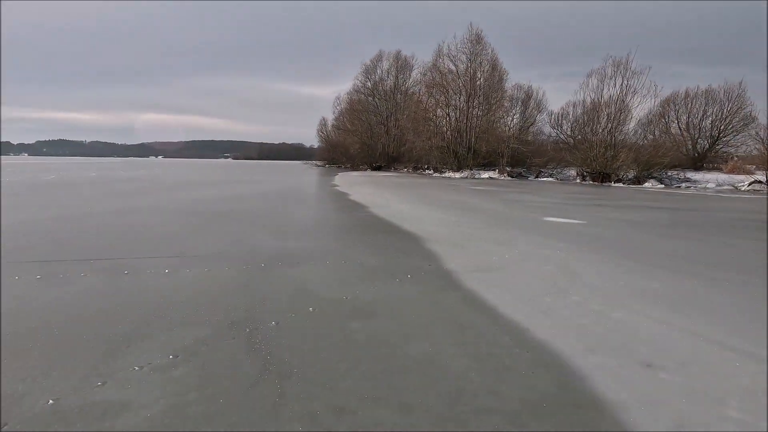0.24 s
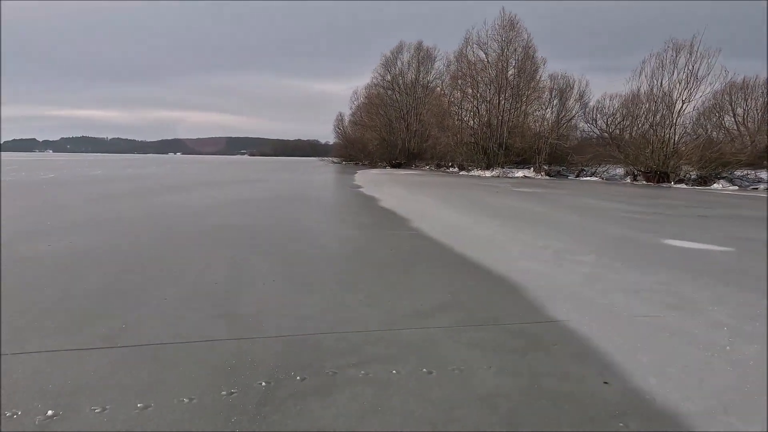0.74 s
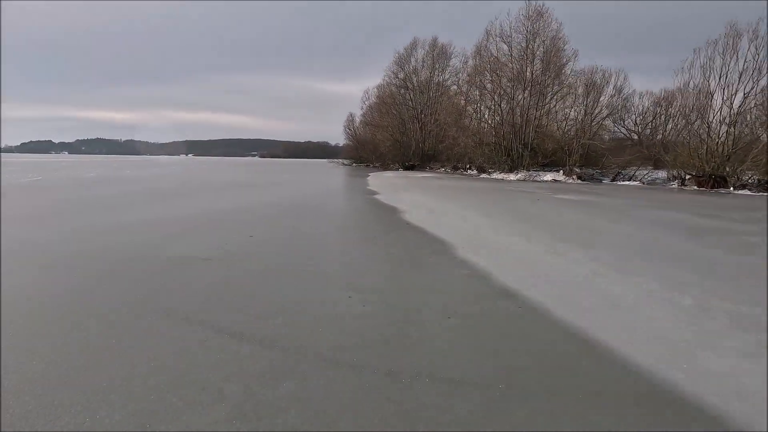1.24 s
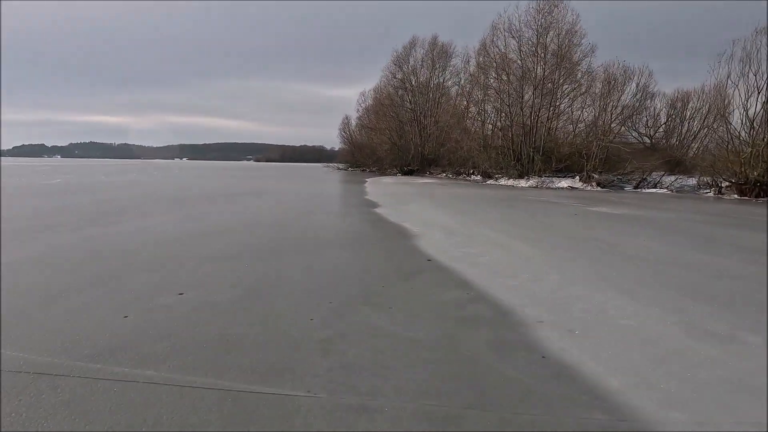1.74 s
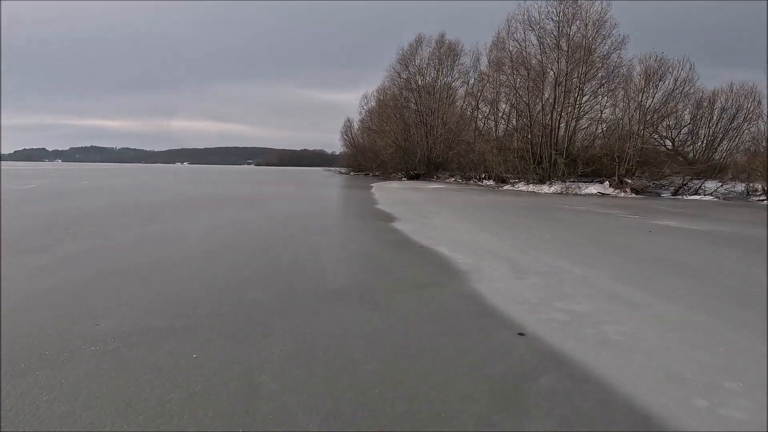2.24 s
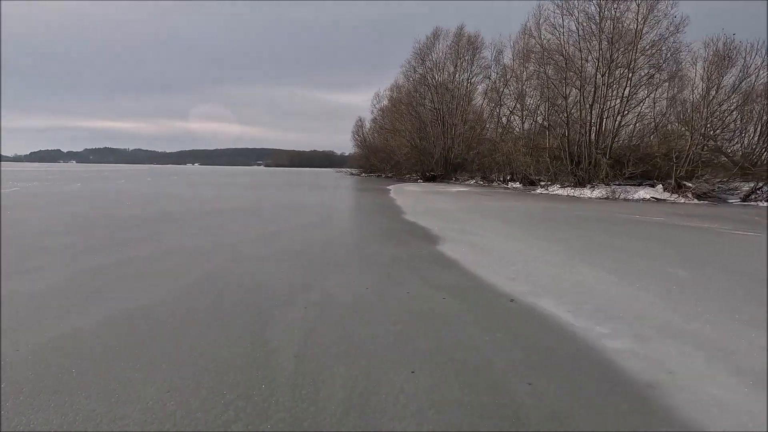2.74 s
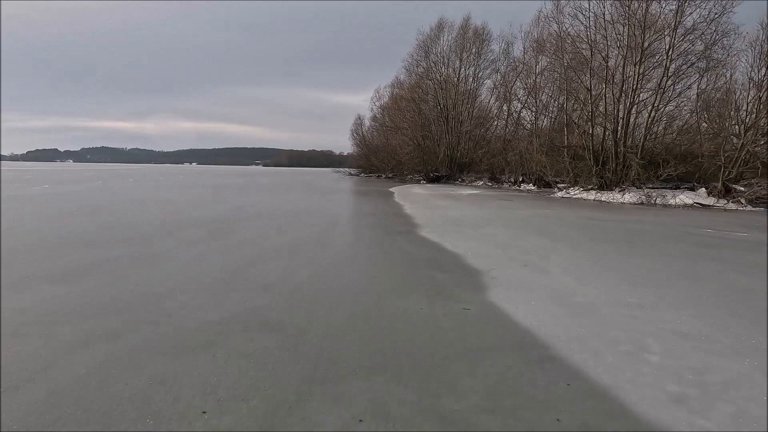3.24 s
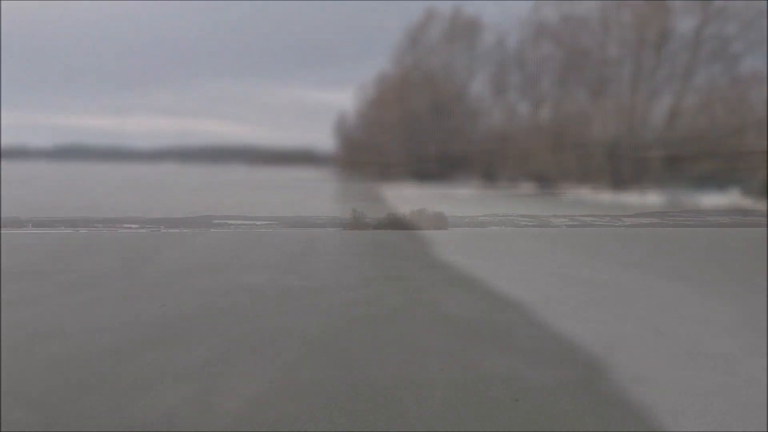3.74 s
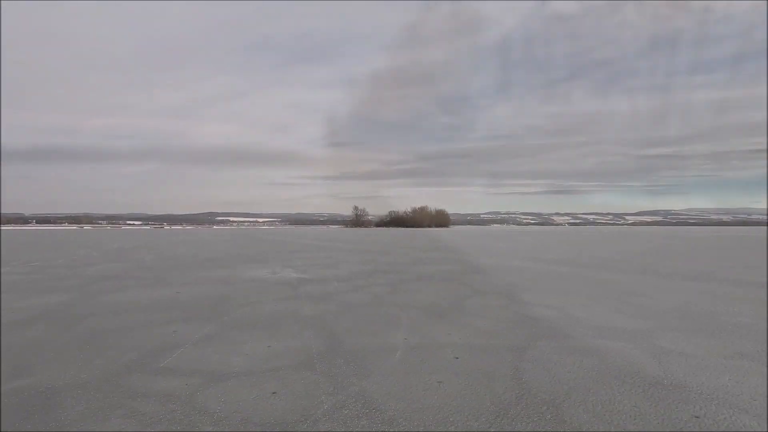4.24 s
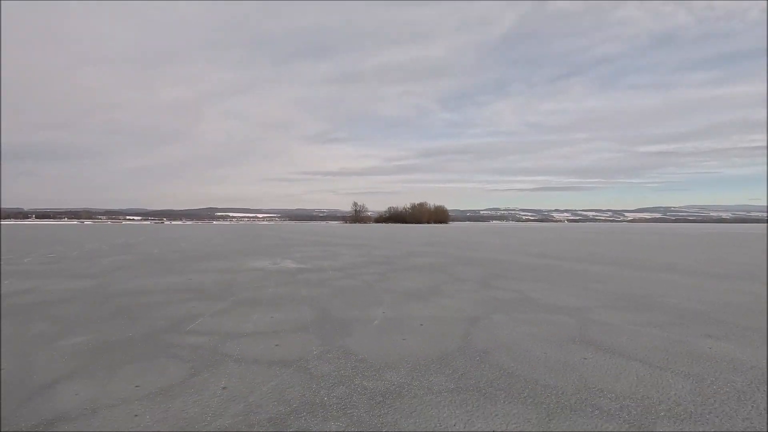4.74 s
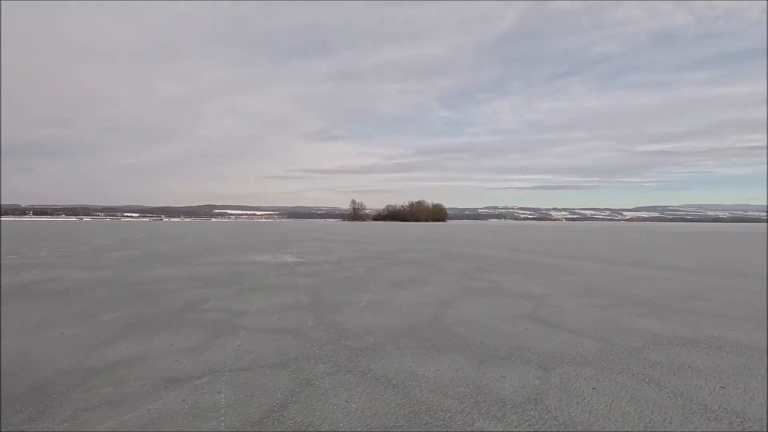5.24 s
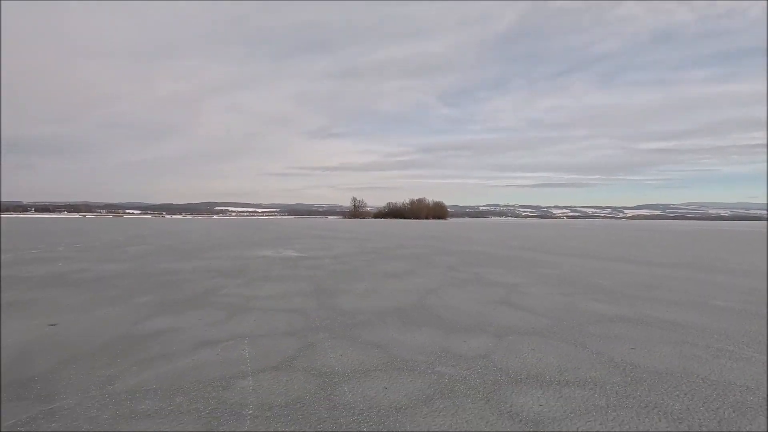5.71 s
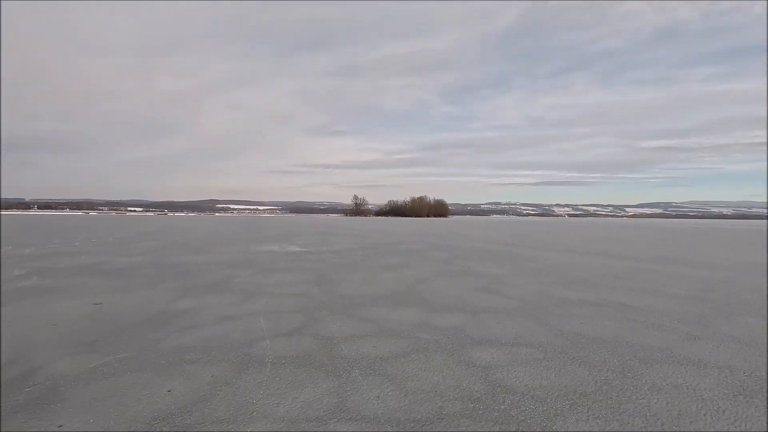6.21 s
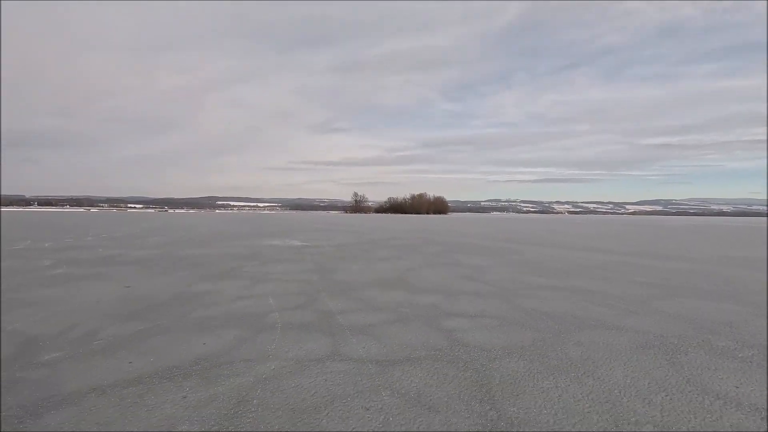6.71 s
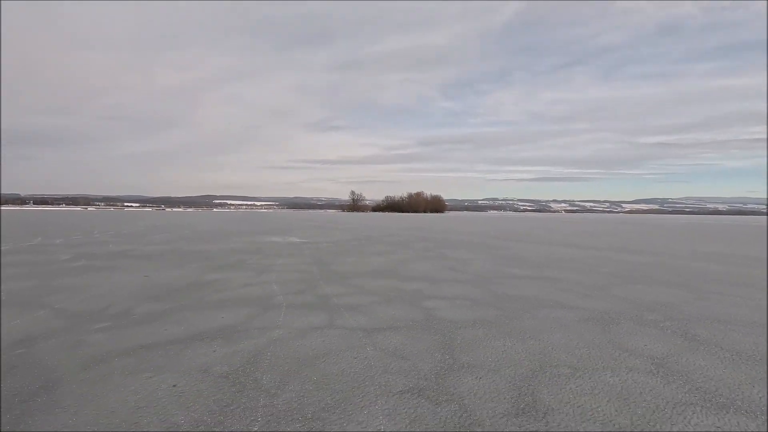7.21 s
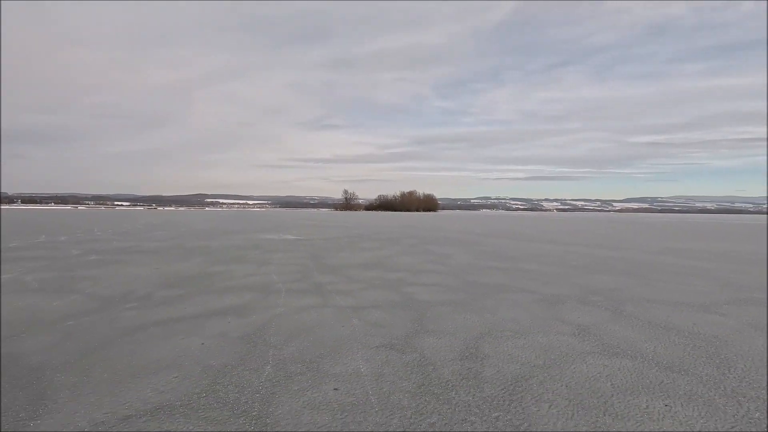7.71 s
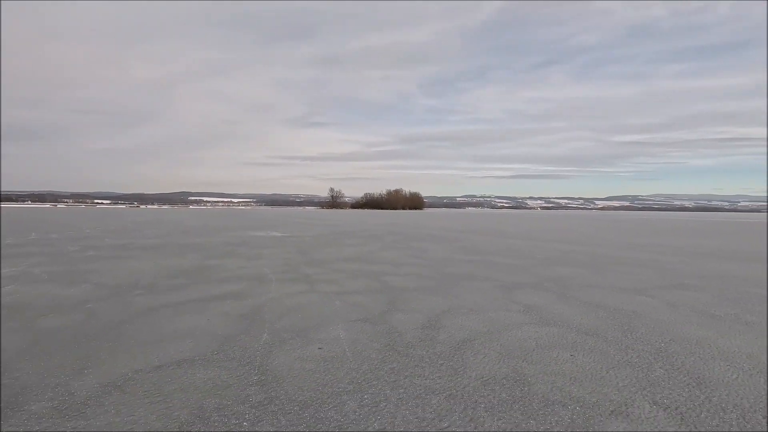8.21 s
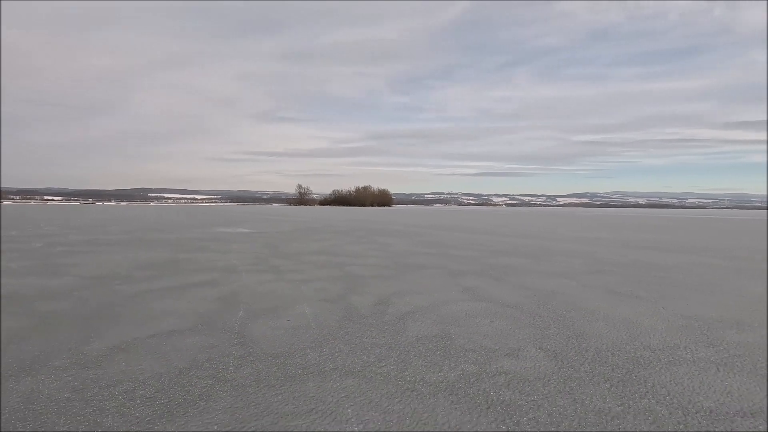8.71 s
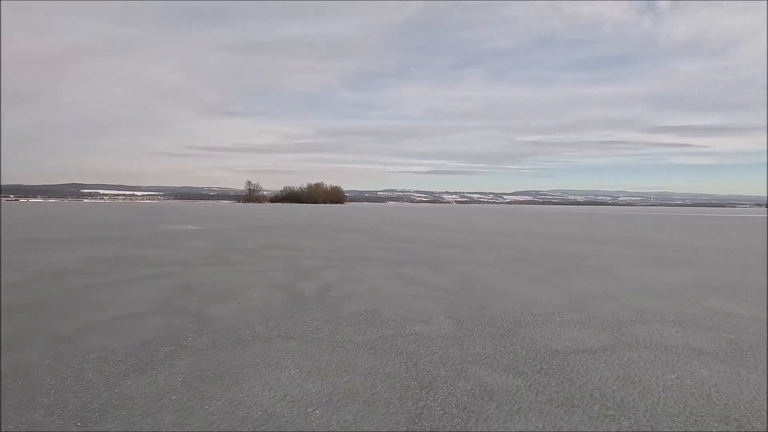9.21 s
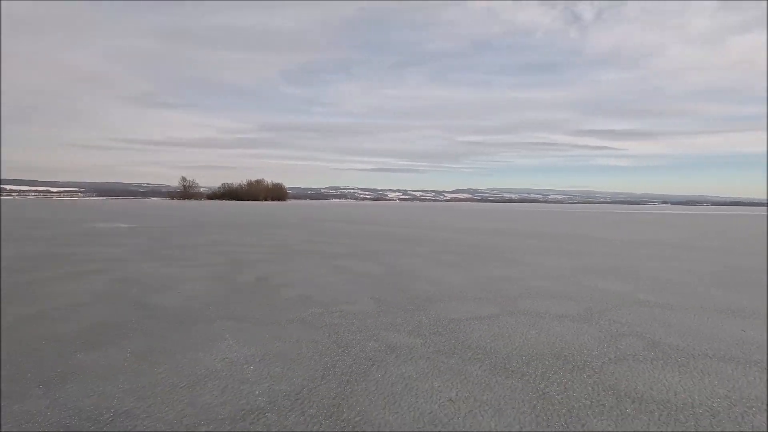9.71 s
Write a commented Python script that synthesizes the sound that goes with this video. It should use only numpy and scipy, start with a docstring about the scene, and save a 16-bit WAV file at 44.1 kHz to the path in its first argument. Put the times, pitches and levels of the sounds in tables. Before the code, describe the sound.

From 0 s, a low skate rumble, crunchy steel grinding and headwind, all close, dry and without echo. From 0.1 s, rapid irregular knocks over rough shore ice: hard clacks with quick falling chirps, gritty crush and a short blade ring. Strong scrapes come around 0.3-0.7 and 1 s, where a short squeal sounds. At 2.0 s a sharper squeal cuts through with scraping until 2.3; more scrapes and faint squeals follow at 2.7-3 s, with tiny ice chips snapping. Around 3.55 s the ice sound changes quickly to a darker, duller open-lake texture. Strong knocks cluster at 3.6-3.9 s, and deep wind thumps peak from 3.9 to 4.5 s. From 5 s scrapes and knocks continue, growing sparser and softer after 6 s. Separate low gusts hit near 6.8, 8.7 and 9.4 s; light scratching, knocks and a final wind swell continue to nearly 10 s.

```python
"""A low rumble of skates, grinding steel and headwind, then from 0.1 s rapid knocks over rough lake ice.
Each knock is a push plus crushed grit, sent through the ice as a quick falling chirp; the blade rings and rasps.
Grinding is noise in spurts with separate crackling grains; scrapes and rides over bumps raise it.
Chips and squeals are noise bursts ringing one mode; wind and rumble are lumpy low noise, eddies short tones.
Two scenes, shore then open ice, join in a 50 ms crossfade; grinding, knocks and rumble differ. No echo."""
import sys
import numpy as np
from scipy import signal
from scipy.fft import rfft, irfft
from scipy.io import wavfile
from scipy.ndimage import uniform_filter1d

SR = 44100
rng = np.random.default_rng(int(sys.argv[2]) if len(sys.argv) > 2 else 0)


def materialize(psi):
    """Save the field psi as 16-bit PCM at rate SR to the path in sys.argv[1].

    A 1-D psi becomes a single channel; in a 2-D psi each row is a channel.
    """
    bounded = np.clip(np.atleast_2d(psi).T, -1, 1)
    quanta = np.round(bounded * 32767).astype(np.int16)
    wavfile.write(sys.argv[1], SR, quanta)


N = 439236
TIME = np.arange(N) / SR
OPEN_FROM_S = 3.56
# event and curve levels below are inputs: filters and layer gains act after them


def amp(db):
    """Decibels to gain."""
    return 10 ** (np.asarray(db) / 20)


def evened(x):
    """Scales to rms 1."""
    return x / np.sqrt(np.mean(x ** 2) + 1e-20)


def shape(points, hz):
    """Gain at hz of a (freq_hz, gain_db) curve, linear in log frequency and flat beyond its ends."""
    freq_hz, gain_db = np.transpose(points)
    return amp(np.interp(np.log(hz + 1), np.log(freq_hz + 1), gain_db))


def curve(points):
    """Linear (time_s, value) curve over the whole scene."""
    time_s, value = np.transpose(points)
    return np.interp(TIME, time_s, value)


def add(mix, centre_s, sound):
    """Mixes in a sound centred on centre_s."""
    start = round(centre_s * SR) - len(sound) // 2
    sound = sound[max(-start, 0):]
    part = mix[max(start, 0):][:len(sound)]
    part += sound[:len(part)]


def flutter(rate_hz):
    """Smooth random signal of rms 1: noise with a Gaussian rolloff at rate_hz."""
    hz = np.fft.rfftfreq(N, 1 / SR)
    slow = rfft(rng.standard_normal(N)) * np.exp(-(hz / rate_hz) ** 2)
    return evened(irfft(slow, N))


def band_rms(spectrum, hz, lo_hz, hi_hz, length_s):
    """Rms within a band, were its energy spread over length_s."""
    inside = (hz >= lo_hz) & (hz < hi_hz)
    energy = np.sum(abs(spectrum[inside]) ** 2) / len(hz)
    return np.sqrt(energy / (length_s * SR) + 1e-20)


def bend(hz, delay_ms):
    """Bending waves in ice: travel time, delay_ms at 1 kHz, goes as 1 / sqrt(f); timed relative to 1 kHz."""
    khz = hz / 1000
    return np.exp(-2j * np.pi * delay_ms * (2 * np.sqrt(khz) - khz))


def resonance(hz, centre_hz, width_hz):
    """Response of one damped mode, gain 1 at its centre."""
    return 1j * hz * width_hz / (centre_hz ** 2 - hz ** 2 + 1j * hz * width_hz)


def ringing(envelope, centre_hz, width_hz):
    """A burst of friction noise rings one mode; rms 1 over the envelope's length."""
    hz = np.fft.rfftfreq(len(envelope), 1 / SR)
    burst = rfft(envelope * rng.standard_normal(len(envelope)))
    return evened(irfft(burst * resonance(hz, centre_hz, width_hz), len(envelope)))


def crossfade(shore, lake):
    """Equal-power crossfade, 50 ms long, at the cut from the first scene's ice sound to the second's."""
    angle = np.pi / 2 * np.clip((TIME - OPEN_FROM_S) * 20 + .5, 0, 1)
    return np.cos(angle) * shore + np.sin(angle) * lake


def turbulence(colour, lo_hz, hi_hz, lumpy_db, lumps_hz):
    """Low noise in lumps, scaled to its rms between lo_hz and hi_hz."""
    hz = np.fft.rfftfreq(N, 1 / SR)
    lumpy = rng.standard_normal(N) * amp(lumpy_db * flutter(lumps_hz))
    spectrum = rfft(lumpy) * shape(colour, hz)
    air = irfft(spectrum / band_rms(spectrum, hz, lo_hz, hi_hz, N / SR), N)
    # the lumps are brief: the level is evened over 6000 samples (0.14 s)
    return air / np.sqrt(uniform_filter1d(evened(air) ** 2, size=6000) + 1e-6)


# steady headwind and skate rumble: time_s, headwind_db, rumble_db
STEADY_LOWS = [(0, -41, -36), (1.2, -43, -54), (2.3, -43.5, -40.5), (3.5, -37, -46.5), (4.2, -40, -43),
               (4.9, -40.5, -61), (6.3, -43, -50), (7.2, -48, -42), (8, -40.5, -53), (9.1, -42.5, -53),
               (9.65, -49.5, -55), (9.96, -32, -44)]
# skate rumble along the shore: freq_hz, density_db_per_hz
SHORE_RUMBLE = [(60, -27), (120, -11), (175, 2), (280, -5.5), (430, -12.5), (700, -50), (1500, -67),
                (4000, -110)]
# skate rumble on the open lake, reaching higher: freq_hz, density_db_per_hz
LAKE_RUMBLE = [(70, -11), (180, -3), (290, -4), (420, -15.5), (580, -21), (800, -50), (1500, -63),
               (4000, -110)]


def rumble(grind, gain_db=-1.5, grind_share_db=-3.5, lake_gain_db=-3.5):
    """The skates rumble over the uneven ice, more when an edge presses hard."""
    time_s, _, rumble_db = np.transpose(STEADY_LOWS)
    steady = amp(np.interp(TIME, time_s, rumble_db))
    level = np.hypot(steady, amp(grind_share_db) * grind)
    shore = turbulence(SHORE_RUMBLE, 130, 450, lumpy_db=5.0, lumps_hz=60)
    lake = turbulence(LAKE_RUMBLE, 130, 400, lumpy_db=8.0, lumps_hz=50)
    return amp(gain_db) * level * crossfade(shore, amp(lake_gain_db) * lake)


# blades running freely: time_s, grinding_db, hiss_db_re_grinding
COASTING = [(0, -40.5, -22.5), (.45, -38.5, -15), (.88, -45.5, -15.5), (1.05, -39, -12), (1.9, -43, -14.5),
            (2.45, -35, -17), (2.65, -45.5, -18), (3.05, -48.5, -16), (3.3, -47.5, -19),
            (3.52, -45.5, -18.5), (3.7, -39.5, -19), (4.349, -37.5, -22.5), (4.6, -46.5, -14.5),
            (5.4, -45.5, -16), (5.8, -39.5, -12), (6.05, -49, -16), (7.3, -52.5, -14), (9.96, -49.5, -13)]
# an edge digs in and scrapes: start_s, length_s, grinding_db, hiss_db_re_grinding
EDGE_SCRAPES = [(0.302, 0.035, -28.5, -13), (0.332, 0.036, -26.5, -23), (0.483, 0.076, -30.5, -15.5),
                (0.605, 0.011, -34, -0.5), (0.634, 0.079, -42.5, -7.5), (0.955, 0.087, -49, -26),
                (1.006, 0.095, -30.5, -20), (1.063, 0.19, -42, -14), (1.27, 0.087, -39, -25),
                (2.014, .048, -28.5, -24), (2.078, 0.042, -29.5, -26), (2.132, 0.035, -34.5, -35),
                (2.211, 0.11, -29.5, -14), (2.72, 0.091, -32, -18.5), (2.835, 0.12, -28, -23),
                (2.986, 0.14, -37, -17.5), (3.544, 0.16, -38, -14.5), (3.84, 0.069, -30.5, -22.5),
                (3.92, 0.025, -33.5, -30), (4.143, .12, -39, -22), (4.494, 0.017, -29.5, -45),
                (4.647, 0.046, -31, -27), (4.883, 0.05, -34.5, -19), (5.104, 0.074, -37.5, -22),
                (5.2, 0.073, -41.5, -10), (5.263, 0.043, -44, -4), (5.444, 0.031, -34.5, -14.5),
                (5.548, 0.15, -40, -14), (5.655, .135, -30, -27), (5.817, 0.11, -45, -11.5),
                (5.96, .05, -52, -13), (5.918, .025, -35, -16), (6.12, 0.061, -55, -10),
                (6.217, 0.018, -38.5, -16), (6.282, 0.018, -44, -33), (6.528, 0.065, -40, -24),
                (6.863, 0.016, -43, -14), (7.081, 0.034, -45, -26), (7.147, 0.035, -39.5, -23),
                (7.767, 0.013, -45, -12), (7.97, 0.057, -41, -13.5), (8.105, 0.023, -37, -30),
                (8.355, 0.024, -36, -23), (8.586, 0.093, -43, -17), (8.724, .11, -37, -22.5),
                (9.056, 0.026, -41, -19), (9.127, 0.069, -40, -17), (9.255, 0.052, -35.5, -16.5),
                (9.416, 0.12, -39, -11.5), (9.557, 0.13, -38.5, -17.5), (9.721, 0.064, -31.5, -18),
                (9.825, 0.087, -37.5, -19)]
BITE_IN_S, LET_GO_S, SAG_DB_PER_S = .007, .0087, -7.5


def pressure():
    """Strength of grinding and of hiss: free running and scrapes add in power."""
    time_s, grind_db, hiss_db = np.transpose(COASTING)
    body = amp(np.interp(TIME, time_s, grind_db)) ** 2
    hiss = amp(np.interp(TIME, time_s, grind_db + hiss_db)) ** 2
    for start_s, length_s, level_db, hiss_db in EDGE_SCRAPES:
        t = np.arange(0, length_s + 10 * LET_GO_S, 1 / SR)
        bite_in = np.minimum(t / BITE_IN_S, 1)
        let_go = np.exp(-np.maximum(t - length_s, 0) / LET_GO_S)
        push = bite_in * amp(level_db + SAG_DB_PER_S * t) * let_go
        centre_s = start_s + t[-1] / 2
        add(body, centre_s, push ** 2)
        add(hiss, centre_s, (push * amp(hiss_db)) ** 2)
    return np.sqrt(body), np.sqrt(hiss)


def crackle(per_s, spread_db, cycles, count=14):
    """Crystals snap one by one; each size of crystal rings for a few cycles at its own pitch."""
    out = np.zeros(N)
    snaps_per_pitch = max(round(per_s * N / SR / count), 1)
    for pitch_hz in np.geomspace(500, 9000, count):
        snaps = np.zeros(N)
        when, size, sign = rng.random((snaps_per_pitch, 3)).T
        strength = amp(spread_db * np.minimum(-np.log(1 - size), 3))
        snaps[(when * N).astype(int)] = np.sign(sign - .5) * strength
        b, a = signal.iirpeak(pitch_hz, max(cycles, 1), fs=SR)
        out += signal.lfilter(b, a, signal.lfilter(b, a, snaps))
    return evened(out)


def slips(per_s, spread_db, life_s):
    """The edge catches and lets go: sudden spurts of friction that die away; rms 1."""
    size = amp(spread_db * np.minimum(rng.exponential(1, N), 3))
    starts = size * (rng.random(N) < per_s / SR)
    return evened(signal.lfilter([1], [1, -np.exp(-1 / (life_s * SR))], starts))


def patches(depth_db, size=1024):
    """The contact point wanders along the blade, so brief narrow bands of the friction noise stand out."""
    z = signal.stft(rng.standard_normal(N), nperseg=size)[2]
    drift = uniform_filter1d(rng.standard_normal(z.shape), size=4, axis=0)
    drift = uniform_filter1d(drift, size=3, axis=1)
    return evened(signal.istft(z * amp(depth_db * evened(drift)), nperseg=size)[1][:N])


# rolloff of the grinding above 8 kHz: freq_hz, gain_db
GRIND_TOP = [(8000, 1.5), (9300, -5), (11200, -8), (12500, -7), (14000, -16), (15500, -31)]


def grinding(colour, grains, steady, patchy_db=7.5, hiss_grain=0.98, hiss_steady=0.47,
             sing=0.11, sing_hz=2640, sing_width_hz=70, delay_ms=1.465):
    """Steel crushes countless small crystals: spurts of noise with separate grains, as a body and a hiss."""
    hz = np.fft.rfftfreq(N, 1 / SR)
    spurts = rng.standard_normal(N) * slips(per_s=170, spread_db=3.0, life_s=0.0053)
    crush = spurts + steady * patches(patchy_db)
    response = shape(colour, hz) * shape(GRIND_TOP, hz) * bend(hz, delay_ms)
    response = response * (1 + sing * resonance(hz, sing_hz, sing_width_hz))
    high = 1 / (1 + (3600 / (hz + 1)) ** 6)  # hiss lies above 3.6 kHz
    body = rfft(crush + grains) * response * (1 - high)
    hiss_noise = crush + hiss_grain * grains + hiss_steady * rng.standard_normal(N)
    hiss = rfft(hiss_noise) * response * high
    body /= band_rms(body, hz, 500, 3200, N / SR)
    hiss /= band_rms(hiss, hz, 4000, 12000, N / SR)
    return irfft(np.array([body, hiss]), N)


# grinding colour along the shore: freq_hz, density_db_per_hz
SHORE_GRIND = [(100, -21), (220, 0), (450, 14.5), (740, 6), (990, 11.5), (1220, 1.5), (1460, 9.5),
               (1750, 4.5), (2120, 7.5), (3400, -10), (4250, -13.5), (5200, -20.5), (8000, -29.5)]
# grinding colour on the open lake: freq_hz, density_db_per_hz
LAKE_GRIND = [(100, -19), (220, 6), (400, 13.5), (590, 16), (880, 5), (1420, 6), (1770, 4.5), (2300, 5),
              (3200, -9.5), (3900, -14), (5000, -23.5), (7300, -28.5), (8000, -31)]


def blades(grind, hiss_level, body_gain_db=-4.5, hiss_gain_db=-3.5):
    """Edge pressure drives the grinding and its hiss."""
    shore_grains = 0.53 * crackle(per_s=900, spread_db=6.5, cycles=2.5)
    lake_grains = 0.35 * crackle(per_s=1100, spread_db=6.0, cycles=3)
    shore = grinding(SHORE_GRIND, shore_grains, steady=0.99)
    lake = grinding(LAKE_GRIND, lake_grains, steady=0.7)
    body, hiss = crossfade(shore, lake)
    return amp(body_gain_db) * grind * body + amp(hiss_gain_db) * hiss_level * hiss


def swell(peak_s, length_s):
    """A smooth rise and fall of height 1, length_s wide at half height."""
    t = np.arange(-round(length_s * SR), round(length_s * SR) + 1) / SR
    out = np.zeros(N)
    add(out, peak_s, np.cos(np.pi / 2 * t / length_s) ** 2)
    return out


# a gust swells and fades: peak_s, half_height_length_s, level_db
GUST_SWELLS = [(.17, 0.091, -37), (.36, 0.081, -28.5), (.51, 0.086, -32), (.72, 0.053, -33.5),
               (.98, 0.13, -30.5), (1.19, 0.061, -38), (1.36, 0.082, -35), (1.62, 0.9, -37.5),
               (2.9, 0.19, -37), (3.34, 0.052, -27.5), (3.65, 0.13, -27.5), (3.9, 0.18, -28),
               (4.11, 0.17, -24.5), (4.44, 0.14, -24.5), (4.66, 0.28, -31), (5.15, 0.27, -33),
               (5.62, 0.26, -32.5), (5.95, 0.33, -37.5), (6.2, 0.09, -34.5), (6.55, 0.08, -37),
               (6.82, 0.075, -32), (7.0, 0.089, -42), (7.37, 0.074, -32), (7.68, 0.19, -33.5),
               (8.09, .3, -35), (8.66, 0.13, -29.5), (8.77, 0.075, -37), (8.92, 0.063, -37),
               (9.4, .09, -33.5), (9.85, 0.088, -32.5)]
# lower part of the wind: freq_hz, density_db_per_hz
GUST_COLOUR = [(8, 0), (25, 1.5), (45, -3.5), (80, -3), (120, -11.5), (200, -21.5), (500, -108),
               (2000, -120)]
# upper part of the wind: freq_hz, density_db_per_hz
EDDY_COLOUR = [(70, -6), (120, -5), (180, 3), (270, -11.5), (420, -18), (800, -55), (3000, -110)]
# an eddy hits the microphone: centre_s, level_db, pitch_hz
EDDY_HITS = [(1.022, -31, 220), (1.427, -26.5, 246), (2.116, -26, 192), (2.167, -32, 230),
             (2.538, -26, 285), (2.759, -25, 258), (2.869, -28, 220), (3.913, -18, 158), (3.988, -32, 111),
             (4.082, -19.5, 148), (4.397, -19.5, 178), (4.487, -22, 170), (4.64, -25.5, 205),
             (4.983, -27.5, 177), (5.105, -27.5, 165), (5.649, -39, 100), (6.805, -23.5, 185),
             (6.829, -23, 176), (7.341, -28.5, 134), (7.373, -39, 217), (7.68, -32, 197), (7.719, -30, 131),
             (7.983, -29, 195), (8.019, -33, 110), (8.665, -24.5, 218), (9.387, -26.5, 156),
             (9.818, -25, 137)]


def wind(gust_gain_db=0.0, upper_gain_db=-11.5, buffet_gain_db=0.5, cycles=0.77):
    """Gusty headwind on the microphone, and single eddies of a swing or two."""
    time_s, breeze_db, _ = np.transpose(STEADY_LOWS)
    power = amp(np.interp(TIME, time_s, breeze_db)) ** 2
    for peak_s, length_s, level_db in GUST_SWELLS:
        power += (amp(level_db) * swell(peak_s, length_s)) ** 2
    gust = np.sqrt(power)
    out = amp(gust_gain_db) * gust * turbulence(GUST_COLOUR, 14.7, 140, lumpy_db=3.0, lumps_hz=25)
    out += amp(upper_gain_db) * gust * turbulence(EDDY_COLOUR, 150, 450, lumpy_db=4.5, lumps_hz=45)
    t = np.arange(-SR // 20, SR // 20) / SR
    for centre_s, level_db, pitch_hz in EDDY_HITS:
        swing = np.sqrt(2) * np.sin(2 * np.pi * (pitch_hz * t + rng.random()))
        envelope = np.exp(-(pitch_hz * t / cycles) ** 2)
        add(out, centre_s, amp(level_db + buffet_gain_db) * swing * envelope)
    return out


# blade meets a bump: centre_s, level_db, thud_db_re_level, bite_db_re_level, ring_hz, grit_0_to_1
BUMP_KNOCKS = [(0.107, -30, -4.5, -7, 2310, 0.7), (0.1445, -36, 5, 0, 2450, 1),
               (0.177, -26, -6, -7.5, 1730, 1), (0.2267, -26.5, -11, -8, 1970, 0.6),
               (0.261, -29.5, 3, -9, 915, 0.8), (0.3288, -24, -6, -9, 800, 0.5),
               (0.3587, -20, -5.5, -16, 1680, 1), (0.444, -25.5, 0.5, 4, 2420, 0.23),
               (0.5069, -37.5, 10, 10, 1900, 0.55), (0.5472, -25, 5.5, -7, 890, 0.6),
               (0.5942, -31.5, 14.5, -1.5, 1740, 0.84), (0.6185, -39.5, -4, 5, 1370, 1),
               (0.6552, -40, 15.5, -4, 1610, 0.85), (0.728, -28, 10, -4, 1360, 0.98),
               (0.7902, -39.5, 15, -1.5, 1440, 0.3), (0.87, -37, 16.5, -1, 1880, 0.34),
               (0.9005, -38, 17, 1, 1500, 0.46), (0.9374, -27, -2, -4, 2160, 0.8),
               (0.9511, -28, -10, -5, 930, 0.4), (0.9644, -31.5, 13, -2, 1510, 1),
               (0.9925, -32, 6, 3.5, 1540, 1), (1.035, -25, -11, 3, 1730, 0.5),
               (1.105, -34, -7, -5, 2010, 0.9), (1.1466, -33, 5.5, -14, 2030, 0.6),
               (1.1781, -30.5, -3, -4.5, 2150, 0.5), (1.1945, -29.5, -3, -6, 2200, 0.9),
               (1.2191, -30, 6.5, -24, 835, 0.55), (1.2667, -27.5, 1.5, -13, 2990, 0.97),
               (1.2865, -33, 11, -7, 930, 0.45), (1.3317, -30.5, 0, -7, 1100, 0.5),
               (1.3559, -26.5, -3, -11, 2010, 0.9), (1.386, -25.5, -4, -8.5, 1130, 0.86),
               (1.4505, -36.5, 3, -2, 2040, 0.3), (1.4867, -25, 3.5, -9, 1720, 0.6),
               (1.5324, -31, 6, -1.5, 1760, 0.1), (1.5931, -20, 0.5, -8.5, 1950, 1),
               (1.6297, -28.5, 0, 6, 2200, 0.1), (1.6717, -31, 10, -5.5, 2200, 0.6),
               (1.7276, -43, 13, -8, 1560, 0.4), (1.7558, -35.5, 4, -8, 2210, 1),
               (1.8014, -26.5, -6, -9, 1850, 0.33), (1.841, -36, 8, -21, 2070, 0.8),
               (1.8589, -27, 0, -20, 970, 0.7), (1.9263, -47, 20, 6, 2080, 0.14),
               (2.0295, -35.5, 0, 11, 1910, 0.6), (2.0675, -25, -6, -3, 1240, 0.5),
               (2.0898, -28, -5, -1.5, 2800, 0.75), (2.1957, -27.5, 0, -15, 1530, 0.6),
               (2.2279, -35, 10.5, 3.5, 2130, 0.5), (2.2752, -21.5, -19, -15, 2390, 0.8),
               (2.2947, -27.5, -3, -7, 1720, 0.7), (2.3146, -29, 8.5, -5, 1420, 0.67),
               (2.355, -31.5, 8, -0.5, 1440, 1), (2.391, -23, 6, -6, 1570, 0.73),
               (2.4384, -19, -15, -16, 880, 0.17), (2.4715, -37.5, 22.5, 12, 1940, 0.9),
               (2.4984, -38, 9, 5, 900, 0.35), (2.575, -38, 12.5, -5, 2180, 0.65),
               (2.6112, -34, 12, 4, 1460, 0.6), (2.7311, -36.5, 9, 4, 2580, 0.77),
               (2.785, -29.5, 7, -8, 990, 1), (2.8247, -27, -10, -8.5, 980, 1),
               (2.8907, -28, 1, -16, 970, 1), (2.9135, -31, 2, -6, 2240, 1),
               (2.9278, -30.5, 4, -6, 1560, 0.5), (2.9815, -27, 5.5, -18, 1330, 0.94),
               (3.0133, -33.5, 3, -3, 2050, 1), (3.0586, -36.5, 13, 0.5, 1420, 0.76),
               (3.138, -26.5, 1.5, -4.5, 2050, 0.46), (3.1742, -38, 10.5, -9, 864, 0.85),
               (3.2112, -37, 12, -5, 885, 0.8), (3.2843, -31.5, 7, -13.5, 860, 0.7),
               (3.3195, -39.5, 7, -3, 1900, 0.9), (3.4068, -29, 3, -14.5, 960, 0.7),
               (3.45, -24.5, 0, -10, 880, 0.7), (3.5317, -32.5, 0.5, -21, 1100, 0.26),
               (3.588, -22.5, -12, -12, 825, 0.4), (3.6087, -27.5, -2, -9, 1350, 0),
               (3.6557, -19.5, -17, -21, 1480, 0.8), (3.7134, -22, -6.5, -19, 1580, 0.7),
               (3.7452, -20.5, -16, -11, 1400, 0.2), (3.7746, -23.5, -4.5, -3.5, 2140, 0.84),
               (3.811, -29.5, -9, -3.5, 950, 0.57), (3.854, -18, -10, -25, 1510, 0.56),
               (3.9519, -26, -2, -10, 930, 0.46), (3.9644, -31, 0, -20, 2470, 0.4),
               (4.0225, -32, 12.5, 4.5, 1510, 0.85), (4.091, -33.5, 7.5, -4, 2040, 0.55),
               (4.1344, -31, -1, -20, 850, 1), (4.1529, -27, 1, -14, 2700, 0.4),
               (4.1779, -33.5, 6.5, -3.5, 2130, 1), (4.2174, -33, 3, -7.5, 2630, 0.7),
               (4.2434, -34.5, 7, -2, 2010, 0.75), (4.3319, -27, -5, -13, 1390, 0.3),
               (4.3732, -32.5, 6, -9, 2210, 0.65), (4.412, -30, 4, -6, 1020, 0.5),
               (4.5012, -23, -9, -27, 1400, 0.4), (4.5166, -29, 0, -18, 1530, 0),
               (4.562, -36.5, 5, -3, 1530, 0.7), (4.6693, -26.5, -6, 6, 1320, 0.2),
               (4.6868, -34, -1, -6, 1960, 0.2), (4.7363, -26, -9, -28, 1440, 0.43),
               (4.7837, -37.5, 8, -8, 2010, 0.4), (4.89, -36.5, 1, 3.5, 1960, 0.6),
               (4.9165, -32.5, 7, -6, 1260, 0.43), (5.0301, -33, 2.5, -8, 1960, 0.97),
               (5.1258, -27, -8, -15, 2160, 0.43), (5.139, -23.5, -12, -17, 990, 0.5),
               (5.2804, -40, 9, -4, 1280, 0.9), (5.413, -41, 10.5, -7, 2190, 0.64),
               (5.4559, -24, -29, -8, 1840, 0.5), (5.5609, -34, 1.5, -2.5, 2280, 0.75),
               (5.6597, -23, -15, -7.5, 1380, 0.7), (5.7395, -22, -17, -26, 1500, 0.74),
               (5.7723, -21, -20, -23, 1440, 1), (5.9034, -23.5, -8.5, -12.5, 840, 0.8),
               (5.9431, -39.5, -5, 3.5, 2710, 1), (6.0556, -30, -4, -17, 1370, 1),
               (6.126, -32, 1, -11, 1480, 0.4), (6.1395, -26.5, -1.5, 0, 1370, 0.46),
               (6.1727, -39.5, -6, 9, 2040, 0.46), (6.3043, -38.5, 3, -11, 2550, 1),
               (6.3521, -38.5, 2, -2.5, 2050, 0.5), (6.4042, -33.5, 1.5, -0.5, 2450, 1),
               (6.4617, -38, 10.5, 5, 1990, 0.43), (6.546, -44.5, 20, 4.5, 1400, 0.43),
               (6.6491, -43, 9.5, -12, 2090, 1), (6.714, -26.5, -6, -7.5, 2410, 0.6),
               (6.7387, -37, -2, -3, 1950, 0.24), (6.8478, -28, -5, -8.5, 2080, 0.96),
               (6.9602, -30.5, 0, -6.5, 2840, 0.75), (7.0046, -44.5, 17.5, 3.5, 1540, 0.47),
               (7.092, -39.5, 11, 0, 1970, 0.5), (7.3013, -30.5, 4.5, -6, 1440, 0.57),
               (7.413, -37, 6.5, -8, 1540, 0.56), (7.4664, -34, 7.5, -4.5, 1920, 0.47),
               (7.6096, -33.5, 1.5, -9.5, 2080, 0.75), (7.6534, -32.5, -5, -13.5, 1980, 0.64),
               (7.8451, -27.5, -6, -15, 1170, 0.35), (7.8698, -36, 8, 2, 1390, 0.65),
               (7.9505, -37.5, 4, -9, 960, 0.44), (8.1173, -27, -13, -3.5, 1890, 0.04),
               (8.1375, -35.5, 4, -5, 2020, 0.5), (8.1873, -32.5, 3, -5, 2030, 0.5),
               (8.207, -32, -6, -6.5, 1440, 0.66), (8.2428, -35, -17, -10, 820, 1),
               (8.3645, -31, -5, 3, 1330, 0.42), (8.4535, -38, 7, -1, 1840, 0.5),
               (8.4674, -33.5, 0.5, -2, 2030, 0.54), (8.6124, -36, 5.5, -0.5, 1330, 0.68),
               (8.7344, -34.5, 2, -0.5, 1980, 0.27), (8.7737, -29, -7, -22, 930, 0.37),
               (8.9112, -32.5, 8.5, 5, 2020, 0.75), (8.9723, -35, 7, -6.5, 2370, 0.94),
               (9.1514, -30.5, 1, -7.5, 830, 0.5), (9.1648, -35.5, 6, -10, 2190, 0.4),
               (9.186, -41, 12, -11, 2440, 0.5), (9.3026, -39, 6, -6, 2630, 0.9),
               (9.4513, -30, -1, -24, 1070, 0.4), (9.4873, -34, 0, -7, 2940, 0.9),
               (9.5117, -33, 4, -11, 2790, 1.0), (9.5426, -35, 6.5, -9, 1520, 0.5),
               (9.5942, -37.5, 3, -2.5, 2240, 0.8), (9.639, -28, -18, -3.5, 1960, 0.3),
               (9.7432, -27.5, -8, -7, 1440, 0.35), (9.7611, -29.5, -23, -10, 1130, 0.9),
               (9.8617, -30.5, 4.5, -6, 1270, 0.5)]
USUAL_DB = -30
PIMPLE_COUNT, PIMPLE_DB, PIMPLE_SPREAD_DB, PIMPLE_MAX_THUD_DB = 14, -40, 3, 10
PIMPLE_BITE_DB, PIMPLE_HZ, PIMPLE_GRIT = -3, 1900, .5


def bumps():
    """The clear knocks, and faint ones strewn at random along the shore."""
    faint = []
    for when, size, thud, ring in rng.random((PIMPLE_COUNT, 4)):
        level_db = PIMPLE_DB + PIMPLE_SPREAD_DB * (2 * size - 1)
        ring_hz = PIMPLE_HZ * 2 ** (ring - .5)
        faint.append((when * OPEN_FROM_S, level_db, PIMPLE_MAX_THUD_DB * thud,
                      PIMPLE_BITE_DB, ring_hz, PIMPLE_GRIT))
    return list(BUMP_KNOCKS) + faint


# edges of the thud, level, bite and treble bands: edge_hz
KNOCK_BAND_EDGES_HZ = [130, 450, 1400, 3200, 10000]
# knock colour before its bands are levelled: freq_hz, density_db_per_hz
KNOCK_COLOUR = [(50, -17), (130, 5), (240, 13), (380, 12), (560, 7.5), (800, 2), (1200, 3), (1430, 7.5),
                (1750, 4), (2150, 7), (3300, -9.5), (4300, -14.5), (8000, -33), (15000, -53)]
# extra knock colour on the open lake: freq_hz, gain_db
LAKE_KNOCK = [(180, -2), (400, -0.5), (590, 8), (1000, -1.5), (1350, -0.5), (1750, -3.5), (2900, -4.5)]
# treble re level: sharp, small and gritty bumps are the brightest
TREBLE_DB, TREBLE_DB_PER_BITE_DB, TREBLE_DB_PER_LEVEL_DB, TREBLE_GRIT_DB = -22.4, .54, -.36, 6.4


def knocks(delay_ms=2.346, lead_s=0.0021, trail_s=0.0024, scatter=2.02, ring=2.26, ring_width_hz=230,
           gritty_hz=800, push_top_hz=3300, rub=0.42, rub_s=0.0052, rub_hz=2600, rub_width_hz=700,
           rub_ring=0.6, size=4096):
    """Each bump is one clean push plus a short crush of grit, both dispersed by the ice sheet."""
    out, hz = np.zeros(N), np.fft.rfftfreq(size, 1 / SR)
    t = (np.arange(size) - size // 2) / SR
    crush = np.exp(np.where(t < 0, t / lead_s, -t / trail_s))
    push = rfft(1. * (t == 0)) / np.sqrt(1 + (hz / push_top_hz) ** 8)
    bands = list(zip(KNOCK_BAND_EDGES_HZ, KNOCK_BAND_EDGES_HZ[1:]))
    centres_hz = [np.sqrt(lo * hi) for lo, hi in bands]
    for centre_s, level_db, thud_db, bite_db, ring_hz, grit in bumps():
        # a gritty bump takes longer to crush
        crumbs = crush ** (1 / (.5 + grit)) * rng.standard_normal(size)
        # the bass is one clean swing; the grit shows higher up
        share = np.clip((grit * scatter + 0.27) * hz / np.hypot(hz, gritty_hz), 0, .95)
        wave = np.sqrt(1 - share ** 2) * push + share * rfft(crumbs / np.linalg.norm(crumbs))
        # the steel rubs as it rides up and off the bump
        blade_ring = resonance(hz, ring_hz, ring_width_hz)
        ride = np.exp(-abs(t) / rub_s) * rng.standard_normal(size)
        steel = resonance(hz, rub_hz, rub_width_hz) + rub_ring * blade_ring
        wave += 2 * rub * np.sqrt(grit) * rfft(ride / np.linalg.norm(ride)) * steel
        wave *= shape(KNOCK_COLOUR, hz) * bend(hz, delay_ms * rng.uniform(0.892, 1.1))
        wave *= np.exp(2j * np.pi * rng.random())  # random phase
        wave *= 1 + ring * blade_ring
        if centre_s > OPEN_FROM_S:
            wave *= shape(LAKE_KNOCK, hz)
        treble_db = TREBLE_DB + TREBLE_DB_PER_BITE_DB * bite_db + TREBLE_GRIT_DB * grit
        treble_db += TREBLE_DB_PER_LEVEL_DB * (level_db - USUAL_DB)
        band_levels_db = level_db + np.array([thud_db, 0, bite_db, treble_db])
        lift_db = []
        for target_db, (lo, hi) in zip(band_levels_db, bands):
            lift_db.append(target_db - 20 * np.log10(band_rms(wave, hz, lo, hi, 0.01)))
        add(out, centre_s, irfft(wave * shape(list(zip(centres_hz, lift_db)), hz)))
    return out


# ride levels hold at grit 0.5 and a force of USUAL_DB
RIDE_S, RIDE_SHORE_DB, RIDE_LAKE_DB, RIDE_DB_PER_FORCE_DB = 0.056, -61, -43, 0.99


def riding():
    """Strength of the grinding as the blade rides over each bump; big, gritty bumps grind most."""
    power, arch = np.zeros(N), signal.windows.tukey(round(RIDE_S * SR), .8)
    for centre_s, level_db, _, bite_db, _, grit in BUMP_KNOCKS:
        force_db = 20 * np.log10(np.hypot(amp(level_db), amp(level_db + bite_db))) - USUAL_DB
        base_db = RIDE_LAKE_DB if centre_s > OPEN_FROM_S else RIDE_SHORE_DB
        ride = arch * amp(base_db + RIDE_DB_PER_FORCE_DB * force_db)
        add(power, centre_s, 2 * grit * ride ** 2)
    return np.sqrt(power)


def steel_rasp(ride, gain_db=-11.5, centre_hz=2500, width_hz=990):
    """Spurts of friction ring the blade broadly while it rides over a bump."""
    hz = np.fft.rfftfreq(N, 1 / SR)
    spurts = rng.standard_normal(N) * slips(per_s=260, spread_db=9.0, life_s=0.0034)
    rasp = irfft(rfft(spurts) * resonance(hz, centre_hz, width_hz) ** 2, N)
    return amp(gain_db) * ride * evened(rasp)


# a chip of ice breaks off: centre_s, level_db, pitch_hz
ICE_CHIPS = [(.107, -49, 3400), (.144, -49, 3100), (.315, -44, 3400), (.362, -43.5, 3080),
             (.616, -46, 3800), (.668, -52, 4030), (.709, -47, 3820), (1.299, -43, 4100),
             (2.419, -39.5, 3750), (2.515, -45, 3940), (2.769, -48, 3700), (2.899, -43, 3210),
             (3.003, -47, 4370), (3.101, -47, 3940), (3.561, -46.5, 4300), (4.714, -49, 6040),
             (5.066, -49.5, 2580), (5.224, -48, 3830), (5.268, -43, 3900), (5.298, -44, 3800),
             (5.529, -51, 3580), (5.872, -45, 3670), (6.888, -48, 3330), (7.363, -49.5, 3300),
             (7.721, -51, 2530), (7.783, -50.5, 4030), (8.655, -47, 3400), (8.836, -47, 3520),
             (9.268, -59, 3410), (9.371, -49, 2420), (9.431, -53, 5500), (9.3, -45, 3900),
             (9.565, -48, 4070), (9.666, -55, 3400), (9.731, -47.5, 3580)]
# fainter chips at random times
SPLINTER_COUNT, SPLINTER_DB, SPLINTER_SPREAD_DB = 40, -65.5, 3.5
SPLINTER_HZ, SPLINTER_SPREAD_OCTAVES = 3400, 0.43


def chips(life_s=0.0032, width_hz=1300, top_hz=6000, size=882):
    """Small bright splinters: a sudden snap that dies quickly."""
    out = np.zeros(N)
    t = (np.arange(size) - size // 2) / SR + life_s / 2
    snap = (t > 0) * np.exp(-abs(t) / life_s)
    faint = []
    for strength, pitch in rng.uniform(-1, 1, (SPLINTER_COUNT, 2)):
        level_db = SPLINTER_DB + SPLINTER_SPREAD_DB * strength
        pitch_hz = SPLINTER_HZ * 2 ** (SPLINTER_SPREAD_OCTAVES * pitch)
        faint.append((rng.random() * N / SR, level_db, pitch_hz))
    for centre_s, level_db, pitch_hz in list(ICE_CHIPS) + faint:
        add(out, centre_s, amp(level_db) * ringing(snap, pitch_hz, width_hz))
    return signal.sosfilt(signal.butter(2, top_hz, fs=SR, output="sos"), out)


# a hard-pressed edge sings briefly: start_s, length_s, pitch_hz, level_db
EDGE_SQUEALS = [(0.256, 0.023, 990, -32.5), (0.431, 0.035, 2500, -37), (1.027, 0.03, 980, -27),
                (2.01, 0.046, 1046, -25), (2.019, 0.038, 1920, -31), (2.024, 0.037, 2690, -27),
                (2.016, 0.0093, 3940, -28), (2.771, 0.019, 970, -29), (2.81, 0.029, 945, -29.5),
                (2.879, 0.029, 956, -29.5), (4.145, 0.021, 2700, -35.5), (6.952, 0.014, 2910, -39.5)]


def squeals(width_hz=65, top_hz=3600):
    """Friction holds a mode of the blade ringing: narrow, unsteady tones."""
    out = np.zeros(N)
    for start_s, length_s, pitch_hz, level_db in EDGE_SQUEALS:
        window = signal.windows.tukey(round(length_s * SR), .25)
        tone = window * ringing(window, pitch_hz, width_hz)
        add(out, start_s + length_s / 2, amp(level_db) * tone)
    return signal.sosfilt(signal.butter(2, top_hz, fs=SR, output="sos"), out)


# top-end gain of all ice sounds: time_s, gain_db
TOP_END_GAIN = [(0, 0), (3.1, 0), (3.5, -8), (4.4, -8), (4.8, -1), (5.2, 1), (9.9, 1)]


def top_end(ice):
    """Above 9.6 kHz all ice sounds follow one gain curve, dullest from 3.5 to 4.4 s."""
    top = signal.sosfiltfilt(signal.butter(4, 9600, "high", fs=SR, output="sos"), ice)
    return ice + (amp(curve(TOP_END_GAIN)) - 1) * top


def scene():
    """Open ice gives no echo: everything is close and dry."""
    grind, hiss_level = pressure()
    ride = riding()
    grind = np.hypot(grind, ride)
    ice = blades(grind, hiss_level) + steel_rasp(ride)
    ice += amp(-0.5) * knocks()
    ice += amp(-1.0) * chips()
    ice += amp(-1.4) * squeals()
    return (top_end(ice) + rumble(grind) + wind())[None]


def record(dry, edge_hz=15700):
    """Band limit of the microphone: a steep linear-phase lowpass."""
    lowpass = signal.firwin(511, edge_hz, window=("kaiser", 9), fs=SR)
    return signal.oaconvolve(dry, lowpass[None], "same")


dry = scene()
out = record(dry)
materialize(out)
```